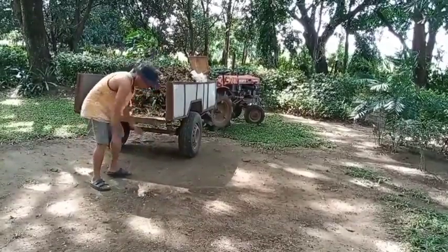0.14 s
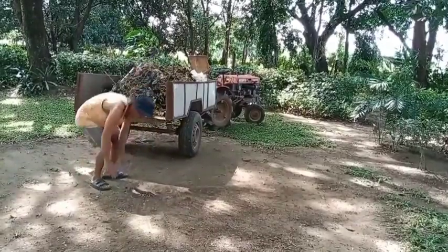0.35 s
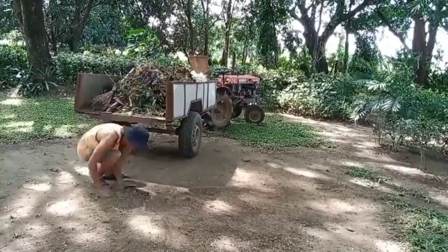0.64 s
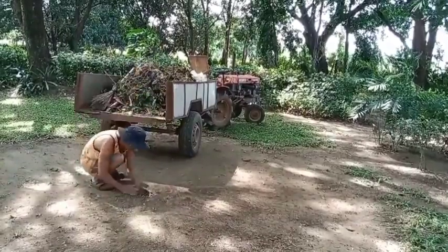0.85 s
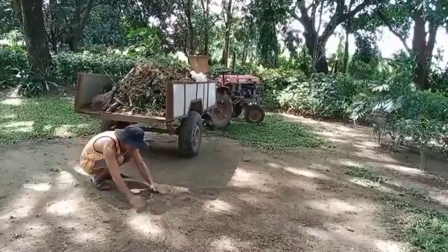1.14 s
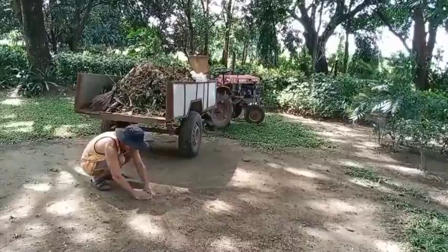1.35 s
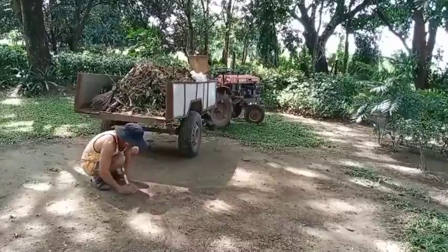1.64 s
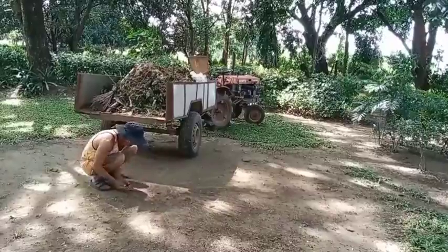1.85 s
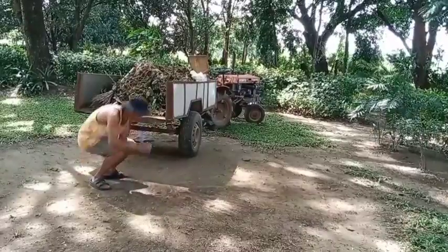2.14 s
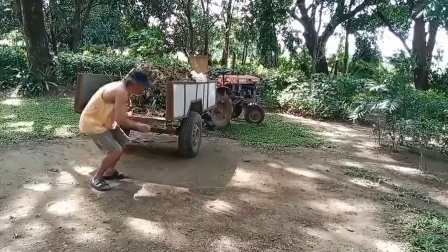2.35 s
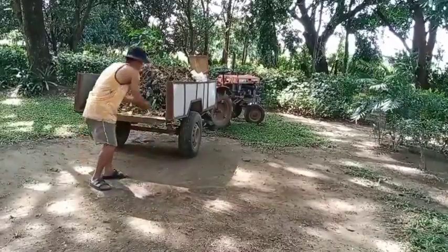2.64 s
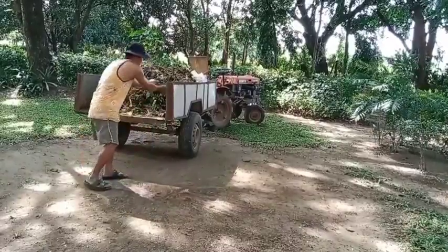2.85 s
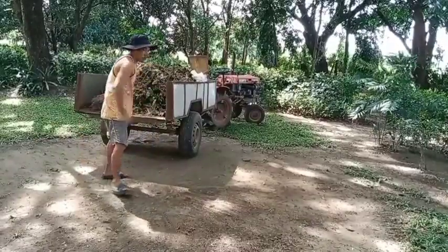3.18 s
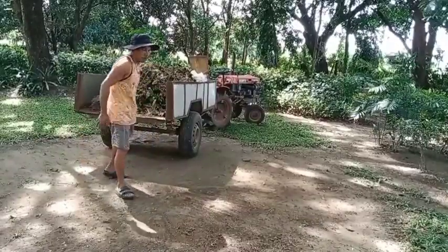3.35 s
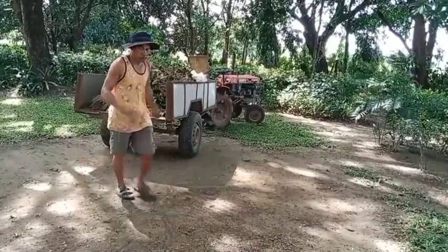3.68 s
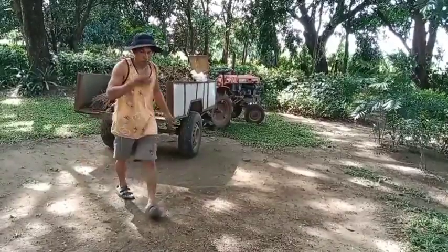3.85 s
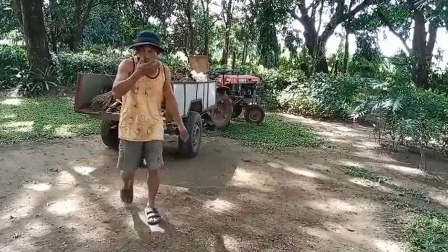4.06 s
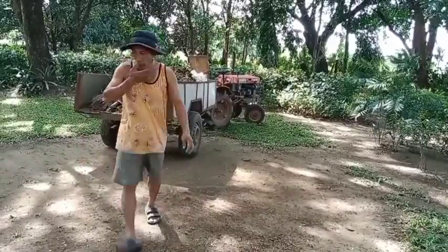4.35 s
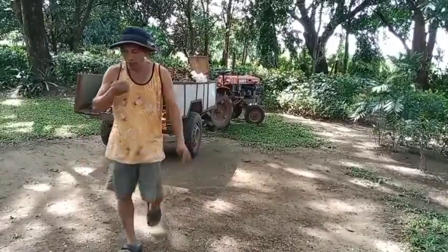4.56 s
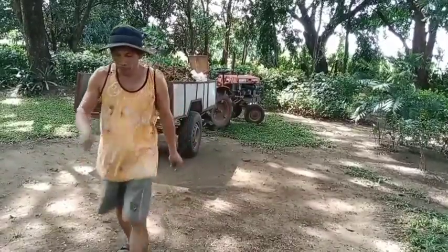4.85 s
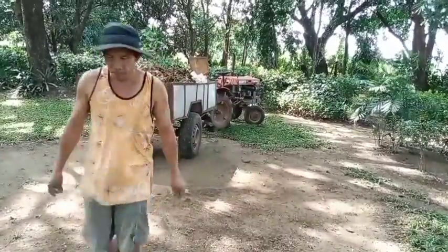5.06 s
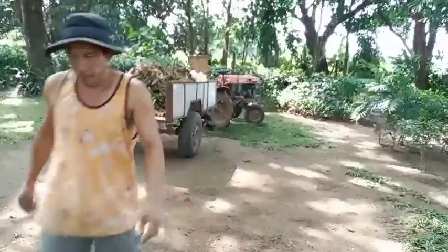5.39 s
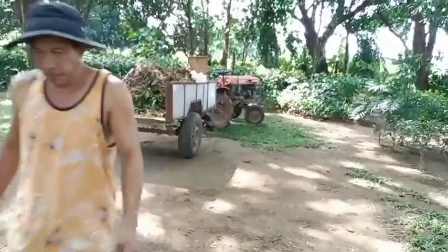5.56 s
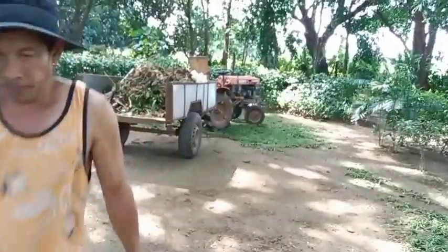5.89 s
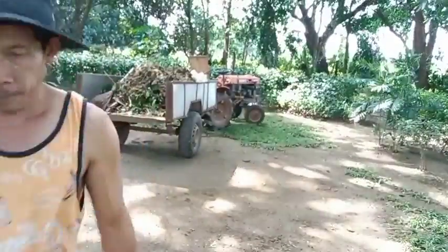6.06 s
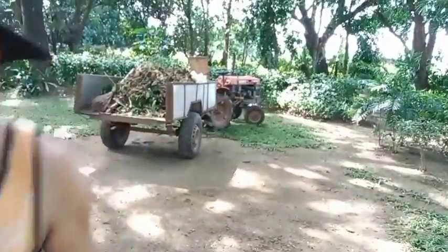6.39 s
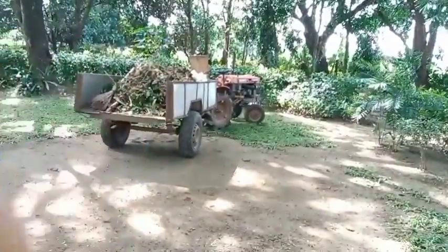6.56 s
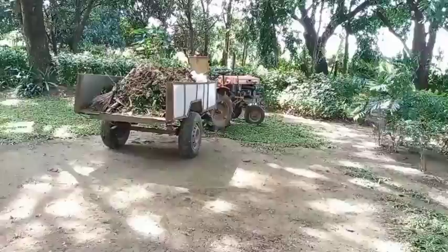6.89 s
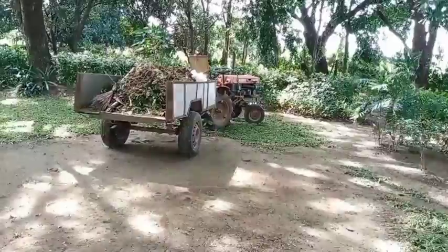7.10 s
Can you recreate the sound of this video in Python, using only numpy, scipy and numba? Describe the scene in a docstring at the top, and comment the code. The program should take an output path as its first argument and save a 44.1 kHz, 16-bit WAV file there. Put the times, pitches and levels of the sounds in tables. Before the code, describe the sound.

Sandals scuff on gritty dirt while insects hiss and birds chirp in a garden, with low wind buffets thumping the microphone.

```python
"""A shaded garden: a man in sandals crosses gritty packed dirt and passes close to the microphone.
His soles spray grit, scrape and snap grains, and dry leaves rustle faintly. Insects hiss in the trees,
and birds whistle, chip, peep and hoot over a soft wash of air. Low buffets, most likely wind, thump
the microphone. The hardest make the recorder turn itself down, and the level creeps back over seconds."""
import sys
import numpy as np
from scipy import signal
from scipy.fft import rfft, irfft, next_fast_len
from scipy.io import wavfile
from scipy.ndimage import uniform_filter1d
from numba import njit

SR = 44100
rng = np.random.default_rng(int(sys.argv[2]) if len(sys.argv) > 2 else 0)


def wav_record(signal):
    """Record a signal, one row per channel, as 16-bit PCM in the file named by sys.argv[1]."""
    frames = np.transpose(np.atleast_2d(signal))
    bounded = np.clip(frames, -1, 1)
    # unit amplitude maps onto the largest positive 16-bit level
    quanta = np.round(bounded * 32767).astype(np.int16)
    wavfile.write(sys.argv[1], SR, quanta)


N = 318843
T = np.arange(N) / SR

# how the garden's wash and the far birds rise and fall together: (time [s], relative level [dB])
BACKGROUND_LEVELS = [(0, -34), (.7, -36.5), (1.5, -33), (2.2, -31), (3.3, -30), (3.7, -31.5), (5.2, -33.5),
                     (6.3, -30.5), (7.2, -31.5)]


def undb(db):
    """Turn decibels into a number to multiply by."""
    return 10 ** (np.asarray(db) / 20)


def unit(x):
    """Scale a signal so that its average size (rms) is 1."""
    return x / np.sqrt(np.mean(x ** 2))


def curve(rows, column=1):
    """One column of a table, joined by straight lines in time."""
    rows = np.array(rows)
    return np.interp(T, rows[:, 0], rows[:, column])


def noise():
    """White noise: an even hiss."""
    return rng.standard_normal(N)


def walk(rate):
    """A smooth random wobble of size 1 that heads somewhere new `rate` times a second."""
    step = max(int(SR / rate), 2)
    held = np.repeat(rng.standard_normal(N // step + 1), step)
    return unit(uniform_filter1d(uniform_filter1d(held, step), step)[:N])


def colour(x, points):
    """Shape a sound's lows and highs by (frequency [Hz], gain [dB]) points, then scale it to size 1."""
    hz, db = np.transpose(points)
    size = next_fast_len(N)
    freqs = np.maximum(np.arange(size // 2 + 1) * SR / size, 1)
    gain = undb(np.interp(np.log(freqs), np.log(hz), db)) * np.minimum(freqs / hz[0], 1)
    return unit(irfft(rfft(x, size) * gain, size)[:N])


def resonate(x, hz, width_hz):
    """Keep a narrow band of a sound, so that it rings at one pitch."""
    return signal.lfilter(*signal.iirpeak(hz, hz / width_hz, fs=SR), x)


def grains(rate, spread_db):
    """Tiny random clicks of uneven size, about `rate` a second."""
    hits = rng.random(N) < rate / SR
    return hits * noise() * undb(spread_db * np.minimum(rng.exponential(size=N), 4))


def swell(at, rise_s, fall_s):
    """A smooth bump that peaks at time `at`."""
    return np.exp(-np.minimum(((T - at) / np.where(T < at, rise_s, fall_s)) ** 2, 100))


def chirps(rate, low_hz, high_hz, length_s, glide, spread_db):
    """A crowd of short sliding tones at random times and pitches, `rate` a second."""
    out = np.zeros(N + SR)
    for when, pitch, stretch, slope, size in rng.random((int(rate * N / SR), 5)):
        samples = int(length_s * (.5 + stretch) * SR)
        progress = np.arange(samples) / samples
        hz = (low_hz + (high_hz - low_hz) * pitch) * (1 + glide * (2 * slope - 1) * progress)
        tone = np.sin(np.pi * progress) * np.sin(2 * np.pi * np.cumsum(hz) / SR)
        start = int(when * N)
        out[start:start + samples] += tone * undb(spread_db * min(-np.log(1 - size), 3))
    return unit(out[:N])


def tree_echo(x, fade_s, db):
    """Add sound scattered by trunks and leaves; it falls by 60 dB in fade_s."""
    age = T[:SR // 2]
    tail = rng.standard_normal(len(age)) * np.exp(-np.log(1000) * age / fade_s)
    return x + undb(db) * signal.fftconvolve(x, tail / np.sqrt(np.sum(tail ** 2)))[:N]


def wind(evenness=0.21, rise_s=0.011, fall_s=0.013, swirl_db=1.5):
    """Swirls of air rumble on the microphone: quick gusts over a light breeze."""
    # tone of the rumble: (frequency [Hz], gain [dB])
    rumble_tone = [(22, -43), (40, -13.5), (64, 3), (87, 3.5), (141, -1), (200, -20), (245, -22),
                   (330, -36.5), (450, -43.5), (700, -48), (1200, -100)]
    # the breeze between gusts: (time [s], level [dB])
    breeze = [(0, -23.5), (.36, -30.5), (.62, -31), (1.0, -27.5), (1.29, -39), (1.34, -21.5), (2.05, -15),
              (2.12, -16.5), (2.3, -17.5), (2.52, -28), (3.0, -24), (3.4, -33.5), (4.1, -32), (4.4, -17.5),
              (4.65, -30.5), (5.9, -27.5), (6.25, -16), (7.2, -18.5)]
    # gusts hitting the microphone: (start [s], hold [s], level [dB])
    gusts = [(0.032, 0.065, -10), (.135, 0.023, -12.5), (0.276, 0.026, -14), (0.412, 0.11, -11.5),
             (0.498, 0.081, -8), (0.687, .02, -19), (1.449, 0.02, -11), (1.667, 0.19, -23),
             (1.852, 0.063, 0.5), (1.939, 0.057, -6), (2.389, 0.078, -8.5), (2.569, 0.083, -7.5),
             (2.82, .15, -5.5), (3.059, 0.068, -7.5), (3.262, 0.033, -6.5), (4.174, 0.12, -11),
             (4.363, 0.02, -12.5), (4.556, .04, -9), (4.7, 0.15, -17.5), (4.894, .08, -18),
             (5.028, 0.13, -12.5), (5.308, 0.092, -21.5), (5.503, 0.08, -8.5), (5.666, 0.13, -15),
             (5.952, 0.05, -15), (6.039, 0.12, 1.5), (6.167, 0.072, -8), (6.448, 0.012, -7),
             (6.715, 0.053, -21)]
    rumble = colour(noise(), rumble_tone)
    strength = uniform_filter1d(abs(signal.hilbert(rumble)), SR // 100)
    rumble = unit(rumble / strength ** evenness)  # makes the swirls more alike in strength
    power = undb(curve(breeze) + swirl_db * walk(26)) ** 2
    for start, hold_s, db in gusts:
        early, late = np.maximum(start - T, 0), np.maximum(T - start - hold_s, 0)
        gust = np.exp(-np.minimum((early / rise_s) ** 2 + (late / fall_s) ** 2, 100))
        power += (undb(db) * gust) ** 2
    return rumble * np.sqrt(power)


def insects(hiss_db=-1, sizzle_db=-20, flutter_db=0.5, drift_db=0.7):
    """Near insects chirp in thin overlapping tones; the far ones blend into a hiss."""
    # tone of the chorus: (frequency [Hz], gain [dB])
    chorus_tone = [(4100, -13), (4900, -12), (5650, -5), (6150, -14), (6430, 1.5), (7000, -0.5), (7700, -5),
                   (8750, -10.5), (9400, -22), (10700, -9), (11200, -15), (12000, -29), (13400, -27),
                   (15300, -18.5)]
    # how loud the chorus is: (time [s], level [dB])
    levels = [(0, -30), (.75, -32.5), (1.3, -31), (2.3, -27.5), (2.55, -29), (3.35, -27.5), (3.9, -32),
              (4.3, -27.5), (4.7, -32.5), (5.9, -30), (6.3, -29.5), (6.55, -29), (7.2, -31)]
    near = chirps(rate=900, low_hz=4730, high_hz=11570, length_s=0.034, glide=0.017, spread_db=-2.0)
    chorus = colour(near + undb(hiss_db) * noise(), chorus_tone)
    sizzle = colour(noise(), [(3000, -60), (11000, -2), (13400, -4), (15300, -3)])
    loudness = undb(curve(levels) + flutter_db * walk(40) + drift_db * walk(5.6))
    return (chorus + undb(sizzle_db) * sizzle) * loudness


def air(flicker_db=1.5, throb_db=-8, band_hz=1275, throbs_per_s=14.8, throb_depth=0.45):
    """The garden's soft wash with a faint crackle of dry leaves; one narrow band throbs in it."""
    # tone of the wash: (frequency [Hz], gain [dB])
    wash_tone = [(40, -28), (80, -14), (130, -1), (300, -10.5), (400, -15.5), (620, -18), (1000, -15.5),
                 (1250, -20), (1550, -17), (2000, -24.5), (3200, -22.5), (4200, -31.5), (6000, -21.5),
                 (10000, -85)]
    wash = colour(noise() + 0.56 * unit(grains(rate=1500, spread_db=1.5)), wash_tone)
    pace = throbs_per_s * (1 + 0.1546 * walk(8))
    throb = 1 + throb_depth * np.sin(2 * np.pi * np.cumsum(pace) / SR)
    band = unit(resonate(resonate(noise(), band_hz, width_hz=117), band_hz, width_hz=117))
    wash *= undb(flicker_db * walk(24))
    return (wash + undb(throb_db) * band * throb) * undb(curve(BACKGROUND_LEVELS))


def far_birds(db=-41.5):
    """Scraps of calls echo from deep in the trees."""
    # tone of the far calls: (frequency [Hz], gain [dB])
    far_tone = [(600, 10), (800, -9), (1000, -5), (1300, 3.5), (1900, -1), (2600, 1.5), (3200, 0.5),
                (4000, -10.5)]
    calls = chirps(rate=130, low_hz=648, high_hz=3905, length_s=0.026, glide=0.093, spread_db=3)
    calls = colour(tree_echo(calls, fade_s=0.24, db=-1.0), far_tone)
    background_db = curve(BACKGROUND_LEVELS)
    return undb(db + background_db - background_db.mean()) * calls


def birds(waver=0.019, rasp=0.27, level_db=-4.2):
    """Birds sing sliding, slightly raspy notes, smeared by echoes from the trunks."""
    # thin high peeps: (time [s], starting pitch [Hz], relative level [dB])
    peeps = [(.03, 5380, -29.5), (.15, 5680, -38), (.6, 5700, -38), (1.05, 5350, -27), (1.19, 5250, -36),
             (2.69, 5410, -30), (4.99, 5180, -30.5), (6.165, 5600, -26.5)]
    # short falling chips: (time [s], starting pitch [Hz], relative level [dB])
    chips = [(.138, 3230, -29.5), (.603, 3180, -21), (.755, 2500, -35.5), (2.8, 3320, -28),
             (4.01, 4120, -34), (4.226, 3100, -29), (4.246, 2686, -20.5), (4.382, 2673, -21.5),
             (6.262, 2010, -29), (6.673, 3663, -32)]
    # one bird's falling whistle: (time [s], pitch [Hz], relative level [dB])
    tune = [(.88, 6300, -30), (.905, 6670, -16), (.922, 6850, -13), (.947, 6120, -24), (.975, 5340, -13.5),
            (1.0, 5000, -21.5), (1.02, 4740, -21), (1.055, 4680, -42)]
    # far soft hoots: (time [s], starting pitch [Hz], relative level [dB])
    hoots = [(2.891, 700, -25.5), (3.185, 1200, -29), (3.43, 710, -33), (5.38, 819, -29), (5.78, 815, -32),
             (6.305, 784, -29)]
    wobble = 1 + waver * walk(520)
    roughness = 1 + rasp * walk(700)
    phase = 2 * np.pi * np.cumsum(curve(tune) * wobble) / SR
    singing = (T > tune[0][0]) & (T < tune[-1][0])
    whistle = np.sqrt(2) * np.sin(phase) * undb(curve(tune, column=2)) * singing
    notes = np.zeros(N)
    # glide is how far a note slides, as a share of its starting pitch
    for calls, length_s, glide in (peeps, 0.1, 0.0146), (chips, 0.043, -0.092), (hoots, 0.07, -0.028):
        for at, first_hz, db in calls:
            span = (T >= at) & (T < at + length_s)
            progress = (T[span] - at) / length_s
            hz = first_hz * (1 + glide * progress) * wobble[span]
            tone = np.sqrt(2) * np.sin(2 * np.pi * np.cumsum(hz) / SR)
            notes[span] += undb(db) * np.sin(np.pi * progress) * tone
    whistle = tree_echo(whistle * roughness, fade_s=0.45, db=1.0)
    notes = tree_echo(notes * roughness, fade_s=0.16, db=-2.0)
    return undb(level_db) * (whistle + notes)


def thumps(width_cycles=0.48):
    """Hard buffets thump the microphone, one with a knock; each sound is a single quick swing."""
    # low thumps, one with a short higher knock: (time [s], peak level [dB], pitch [Hz])
    hits = [(0.456, -4, 170), (0.4859, 13.5, 151), (1.865, 10.5, 110), (1.914, 9.5, 114), (2.004, 7, 102),
            (2.247, 5, 102), (2.448, 12, 107.5), (2.632, 7, 84.4), (2.838, 7.5, 119), (4.255, 2, 186),
            (4.267, 5.5, 168), (4.277, 5.5, 95), (5.553, 0.5, 111), (6.094, 4, 97), (6.133, -8.5, 403),
            (6.137, 11.5, 97), (6.503, 6.5, 103), (6.683, -7.5, 169)]
    out = np.zeros(N)
    for at, db, hz in hits:
        width_s = width_cycles / hz
        swing = np.sin(2 * np.pi * hz * (T - at)) * swell(at, width_s, width_s)
        out += undb(db) * swing / swing.max()
    return out


def scuffs_and_rustles(grit_lead_s=0.016, rise_share=0.29, ring_db=13, overtone_ratio=1.764, squeak_db=6):
    """Grit sprays, then a sole presses down and scrapes; the same sounds, kept faint, make leaf rustles."""
    # footstep scuffs and a few faint dry rustles: (time [s], length [s], scrape [dB], grit [dB],
    # sand [dB], ring pitch [Hz], overtone gain [dB])
    contacts = [(1.287, 0.067, -51, -46, -45, 1250, 9), (2.913, 0.069, -27, -53, -56, 1300, -2),
                (3.131, 0.023, -24, -48, -47, 1290, -2), (3.19, 0.081, -37, -41, -43, 1200, 0),
                (4.01, 0.038, -30, -52, -56, 1610, 3), (4.526, 0.052, -19.5, -48, -56.5, 1293, 2.5),
                (5.075, 0.13, -33, -44, -44, 1280, 5.5), (5.575, 0.067, -14, -12, -40, 1226, -14),
                (5.975, 0.03, -42, -27.5, -40, 1380, 0), (6.066, 0.12, -23, -17.5, -39, 1276, -6),
                (6.54, 0.075, -19, -31, -23, 1410, 15.5), (7.094, 0.12, -21.5, -40, -48, 1530, 9)]
    # tone of the scrape: (frequency [Hz], gain [dB])
    scrape_tone = [(500, -27), (1000, -4), (1700, -0.5), (2200, -10.5), (3300, -7.5), (4400, -12.5),
                   (5600, -3.5), (8000, -9), (15000, -36)]
    # tone of loose grit: (frequency [Hz], gain [dB])
    grit_tone = [(1500, -49), (3300, -2), (4400, -9.5), (5600, 7), (6800, 11), (8200, 3), (9500, -9),
                 (11500, -0.5), (14000, 0), (15500, 3)]
    # tone of fine sand: (frequency [Hz], gain [dB])
    sand_tone = [(6000, -35), (11000, -6), (12500, 0), (15500, 2)]
    scrape = colour(grains(rate=6000, spread_db=1.0), scrape_tone)
    scrape *= undb(3 * walk(130))  # the scrape comes in jerks
    crunch = undb(2.4 * walk(300))
    grit = colour(grains(rate=22000, spread_db=0.5), grit_tone) * crunch
    sand = colour(grains(rate=6800, spread_db=-5.0), sand_tone) * crunch
    out = np.zeros(N)
    for at, length_s, scrape_db, grit_db, sand_db, hz, overtone_db in contacts:
        rise_s, fall_s = length_s * rise_share, length_s * (1 - rise_share)
        rub = scrape + undb(ring_db) * resonate(scrape, hz, width_hz=127)
        rub += undb(overtone_db) * resonate(scrape, hz * overtone_ratio, width_hz=240)
        # each contact also rings at a few pitches of its own
        for squeak_hz in rng.uniform(1000, 3483, size=3):
            rub += undb(squeak_db) * resonate(scrape, squeak_hz, width_hz=29)
        pressure = swell(at, rise_s, fall_s)
        out += undb(scrape_db) * unit(rub * pressure) / unit(pressure).max()
        out += undb(grit_db) * grit * swell(at - grit_lead_s, rise_s, fall_s)
        out += undb(sand_db) * sand * pressure
    return out


def snaps(decay_s=0.00098, body_hz=1270):
    """A grain snaps under a sole: a high ping, a lower knock and a burst of noise die away at once."""
    # breaking grains: (time [s], level [dB], ping pitch [Hz])
    breaks = [(5.549, -2, 7450), (5.5635, 3, 6240), (5.6023, 5.5, 5230), (6.574, -8, 13730)]
    out = np.zeros(N)
    for at, db, hz in breaks:
        age = np.maximum(T - at, 0)
        ring = np.sin(2 * np.pi * hz * age) + 0.23 * np.sin(2 * np.pi * body_hz * age)
        burst = 0.34 * noise() * (age > 0)
        out += undb(db) * (ring + burst) * np.exp(-age / decay_s)
    return out


def scene():
    """All the sounds added together, in one channel."""
    rumble = wind() + thumps()
    ground = tree_echo(scuffs_and_rustles() + snaps(), fade_s=0.057, db=-5.5)
    return (rumble + ground + insects() + birds() + far_birds() + air())[None]


@njit
def hold(over, keep):
    """Follow a rise at once and let go slowly."""
    out, held = np.empty(len(over)), 0.
    for i in range(len(over)):
        held = max(over[i], held * keep)
        out[i] = held
    return out


def record(dry, release_s=3.3, attack_s=0.0002, top_hz=15550):
    """The recorder turns down when a peak is too big, clips what slips by and cuts the highest treble."""
    over_db = 20 * np.log10(np.maximum(abs(dry[0]), 1))
    cut_db = hold(over_db, np.exp(-1 / (release_s * SR)))
    cut_db = uniform_filter1d(cut_db, int(attack_s * SR))
    limited = np.clip(dry * undb(-cut_db), -1, 1)
    return signal.sosfilt(signal.ellip(10, .2, 85, top_hz, fs=SR, output="sos"), limited)


dry = scene()
out = record(dry)
wav_record(out)
```